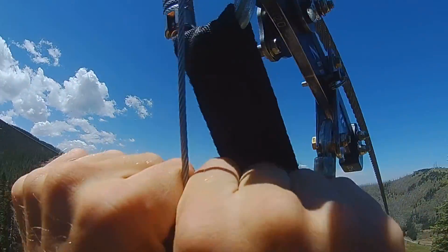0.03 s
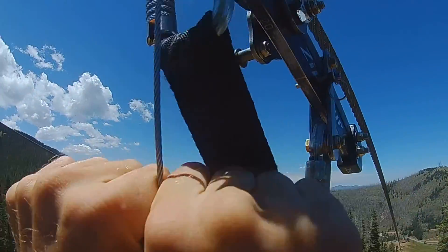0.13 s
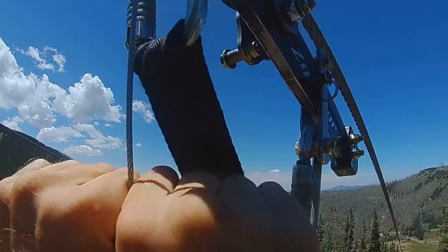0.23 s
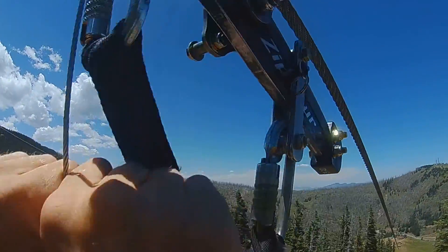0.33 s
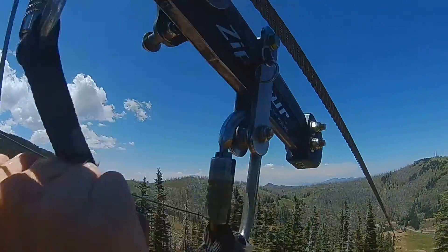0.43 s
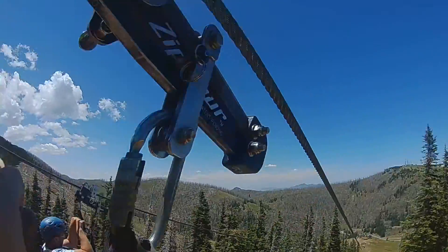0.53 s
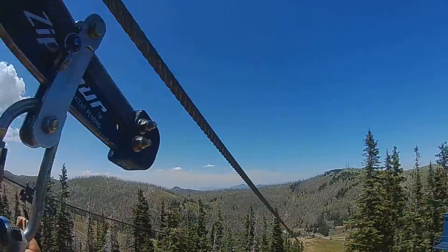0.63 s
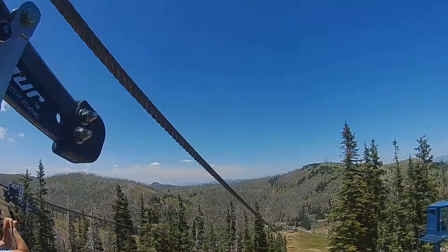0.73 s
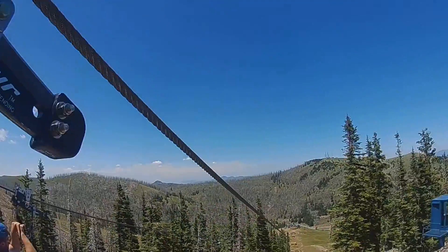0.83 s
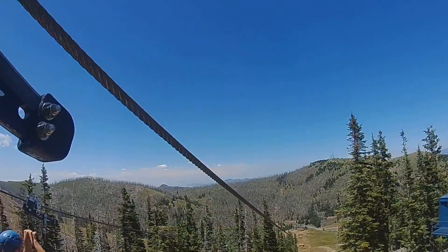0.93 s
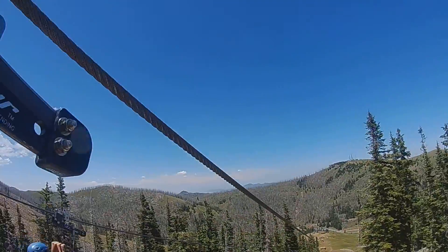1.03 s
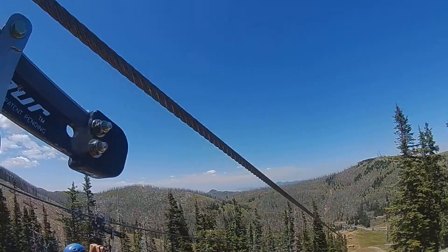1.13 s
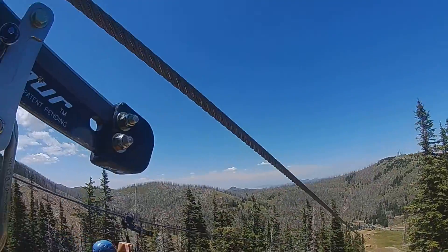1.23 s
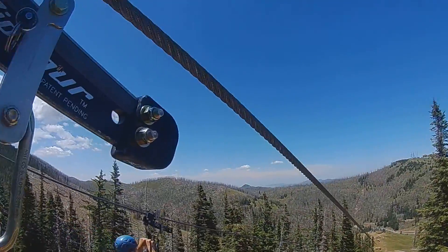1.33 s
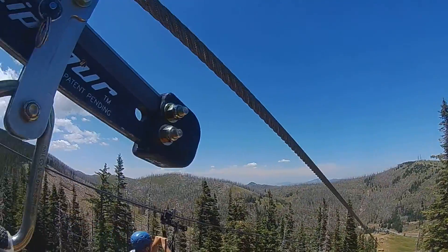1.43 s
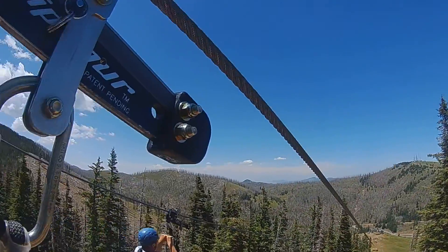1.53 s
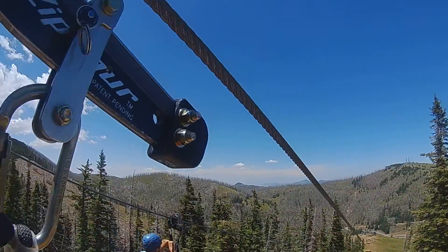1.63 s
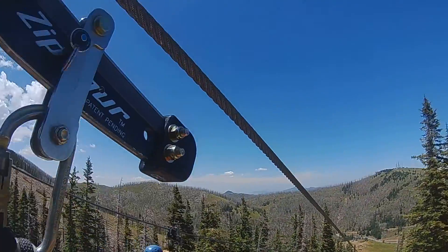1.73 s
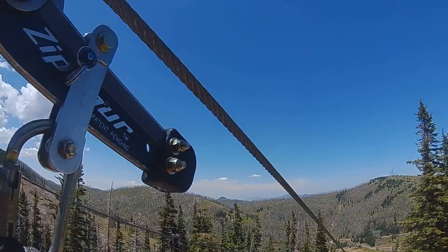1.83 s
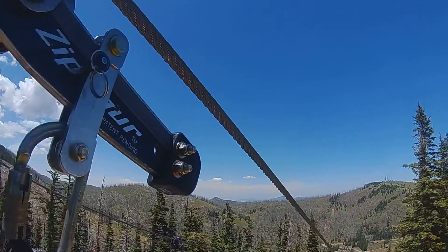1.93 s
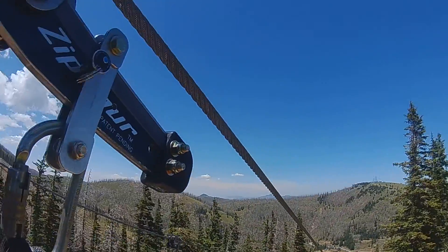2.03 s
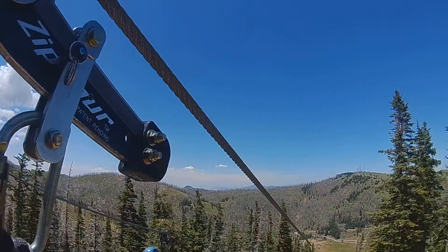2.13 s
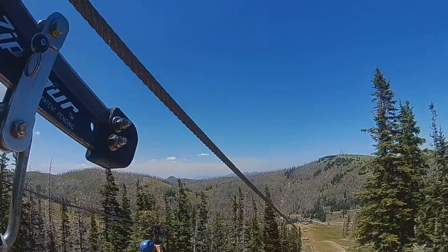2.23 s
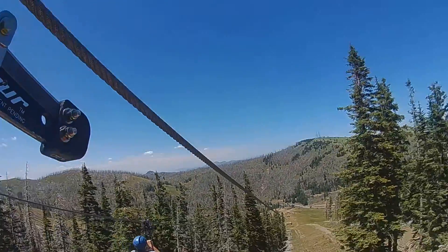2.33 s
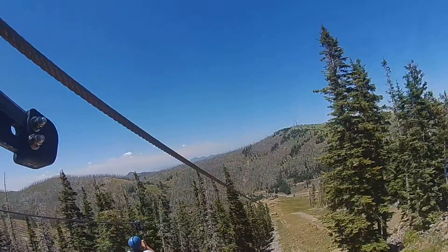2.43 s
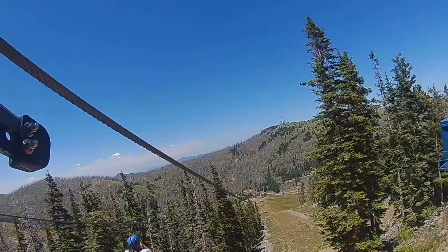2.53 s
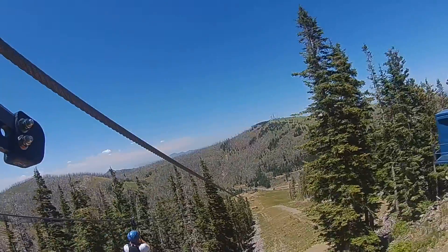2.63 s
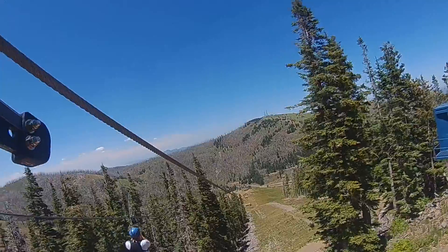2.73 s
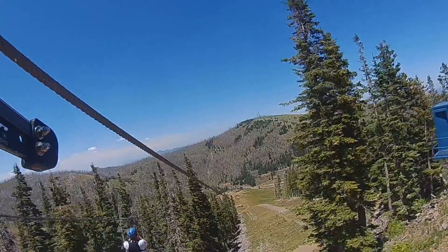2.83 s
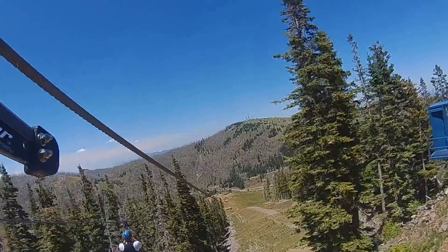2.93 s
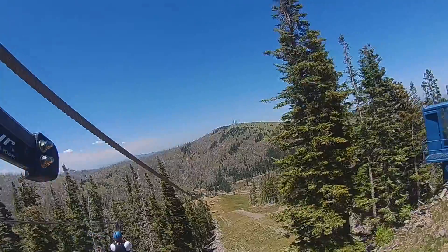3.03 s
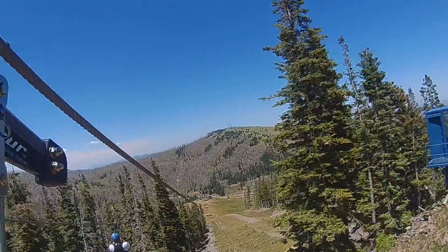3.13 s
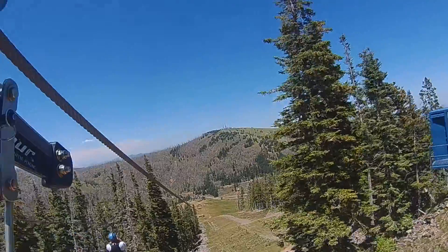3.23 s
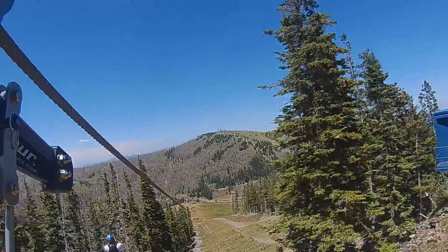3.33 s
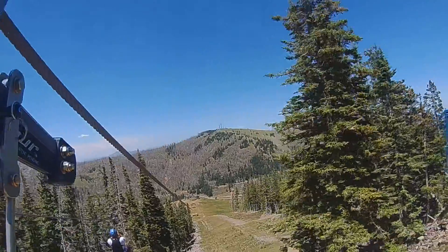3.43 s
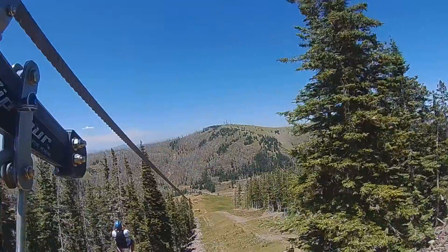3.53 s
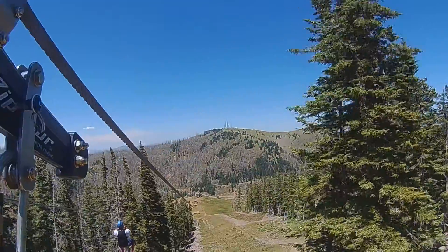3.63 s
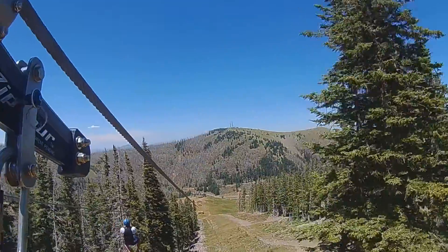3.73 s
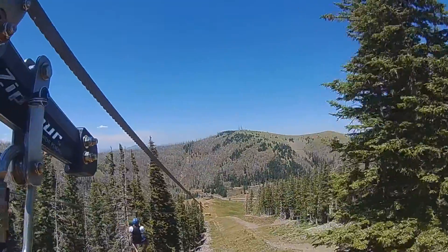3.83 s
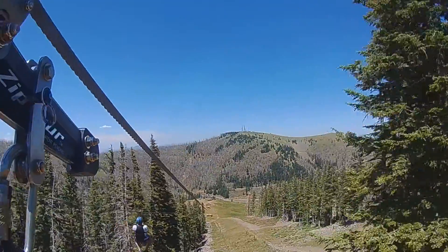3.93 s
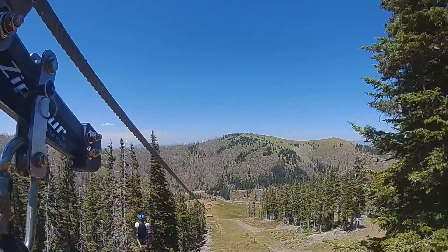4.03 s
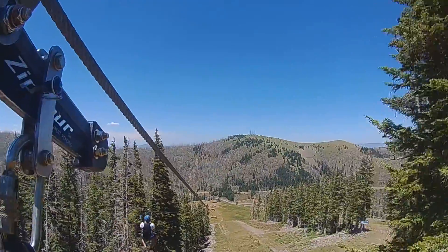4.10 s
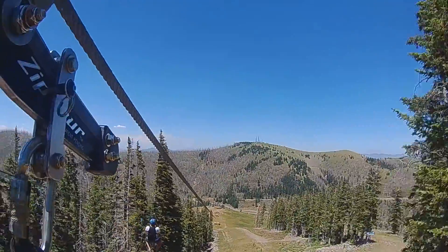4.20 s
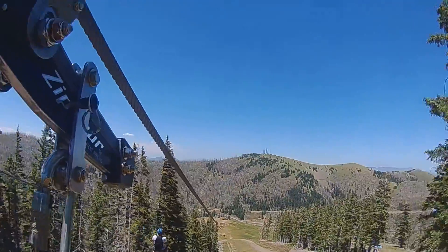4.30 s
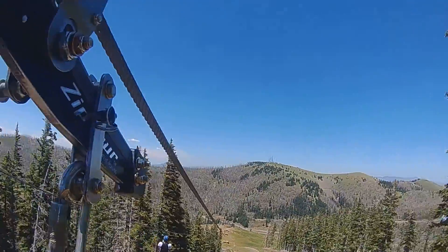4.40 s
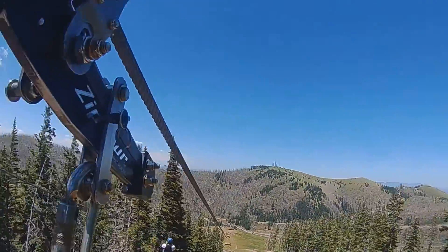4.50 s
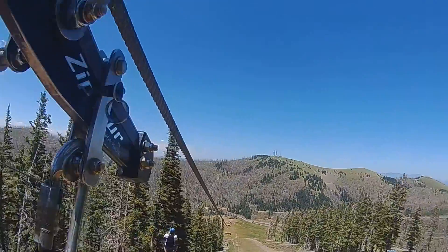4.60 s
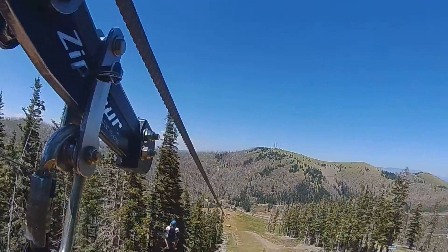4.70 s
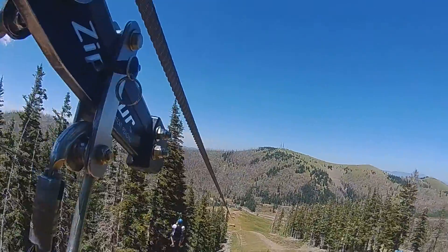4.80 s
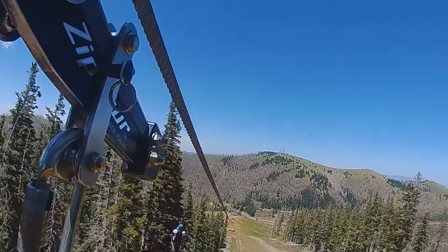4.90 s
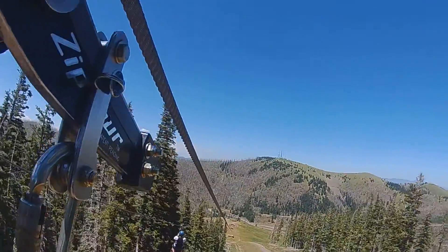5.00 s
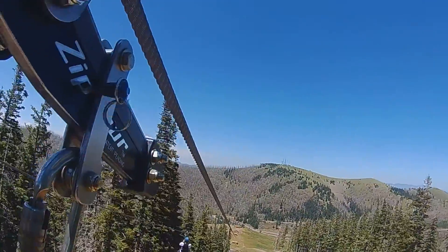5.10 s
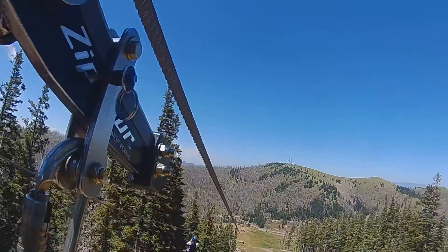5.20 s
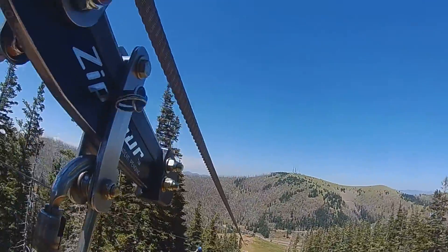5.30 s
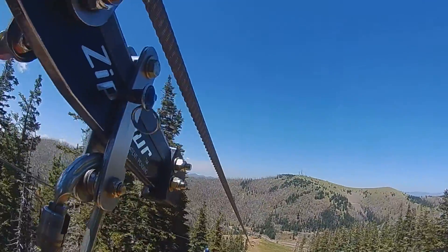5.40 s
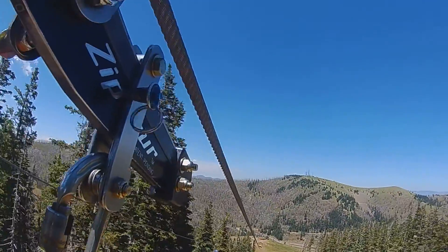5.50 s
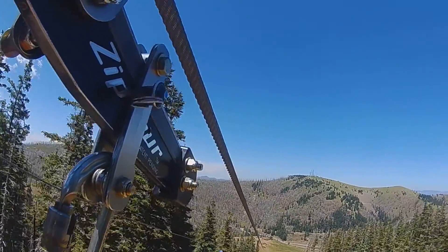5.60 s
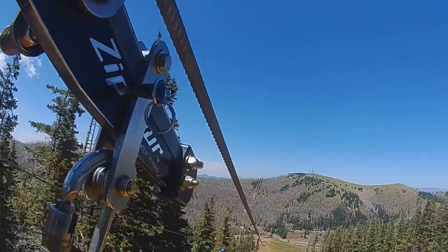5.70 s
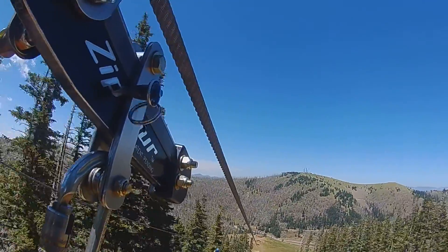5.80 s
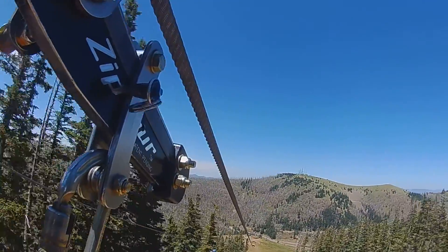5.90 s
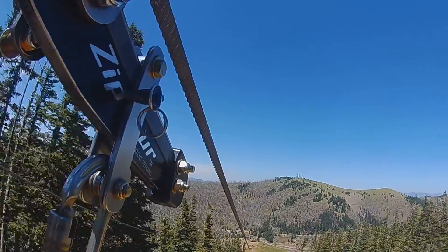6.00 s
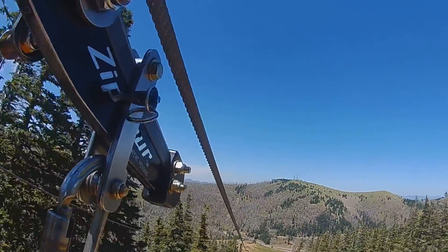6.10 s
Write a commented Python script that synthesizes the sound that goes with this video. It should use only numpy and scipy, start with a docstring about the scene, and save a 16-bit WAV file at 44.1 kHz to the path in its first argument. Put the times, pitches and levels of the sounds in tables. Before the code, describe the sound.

Close, uneven metallic knocks and clatter come from trolley wheels setting off down a zip line, with a few small pings and a brief harsher scrape. The knocks thin out and the rolling smooths into a continuous metallic rush, growing louder as the cable's whine rises in pitch. The rigging hums low underneath, and open air rushes over the microphone riding just under the cable.

```python
"""Just below a zip line, as a trolley gathers speed on the twisted steel cable.
The wheels rattle and knock over the wires and ring the metal of the trolley; the strands passing under
them sing a rising whine. A loose fitting pings, and there is one dull bump. With speed the rattle fuses
into a steady rush, the rigging hums, wind builds at the microphone and a thin hiss creeps in on top."""
import sys
import numpy as np
from scipy import signal
from scipy.fft import rfft, irfft
from scipy.io import wavfile
from scipy.ndimage import uniform_filter1d, minimum_filter1d

SR = 44100
rng = np.random.default_rng(int(sys.argv[2]) if len(sys.argv) > 2 else 0)


def output_pcm(signal):
    """Save a mono or channel-first signal as 16-bit PCM at the path in sys.argv[1].

    Samples are clipped to [-1, 1] before scaling.
    """
    pcm = np.clip(np.atleast_2d(signal).T, -1, 1) * 32767
    wavfile.write(sys.argv[1], SR, np.round(pcm).astype(np.int16))


N = 271215
TIME = np.arange(N) / SR
STRANDS_PER_TWIST = 6


def amp(db):
    """Decibels to gain."""
    return 10 ** (np.asarray(db) / 20)


def unit(x):
    """Scales to rms 1."""
    return x / np.sqrt(np.mean(x ** 2) + 1e-20)


def steady(x):
    """Rides the level to hold the running rms near 1."""
    return x / np.sqrt(uniform_filter1d(x ** 2, size=6000))


def noise(spectrum):
    """Noise of rms 1, coloured by a curve of (Hz, dB) points."""
    hz, db = np.transpose(spectrum)
    gain = amp(np.interp(np.log(np.fft.rfftfreq(N, 1 / SR) + 1), np.log(hz), db))
    return unit(irfft(rfft(rng.standard_normal(N)) * gain, N))


def drift(hz):
    """A smooth random wander of rms 1, rolling off above hz."""
    gain = np.exp(-(np.fft.rfftfreq(N, 1 / SR) / hz) ** 2)
    return unit(irfft(rfft(rng.standard_normal(N)) * gain, N))


def ring(force, modes, damping_hz=7600):
    """Rings steel with a force: steep-sided resonances in a causal filter of unit energy."""
    bins = np.fft.rfftfreq(4096, 1 / SR)
    power = sum(amp(db) ** 2 / (1 + (2 * (bins - hz) / width) ** 2) ** 2 for hz, width, db in modes)
    power = power / (1 + (bins / damping_hz) ** 6)
    cepstrum = irfft(np.log(power + 1e-12) / 2)
    cepstrum[1:len(bins) - 1] *= 2  # minimum phase, so the ring follows the hit
    cepstrum[len(bins):] = 0
    response = irfft(np.exp(rfft(cepstrum)))
    return signal.oaconvolve(force, response / np.linalg.norm(response))[:len(force)]


def grown(speed, rest_db, full_db, power):
    """A fader in dB that follows the speed, from rest (0) to full speed (1)."""
    return rest_db + (full_db - rest_db) * speed ** power


def stretch(start, end, edge_s):
    """Fades up to 1 around start, holds, and fades out around end."""
    return np.clip(np.minimum(TIME - start, end - TIME) / edge_s + .5, 0, 1)


def lifts(rows, edge_s):
    """Summed lift in dB from rows of (start, end, dB)."""
    return sum(db * stretch(start, end, edge_s) for start, end, db, *_ in rows)


def add(mix, start_s, sound):
    """Drops a sound into the mix."""
    part = mix[round(start_s * SR):][:len(sound)]
    part += sound[:len(part)]


def wheel_pressure(strands, speed, jolt_s=.006):
    """The wheel bears on the cable with random jolts and a beat for each twist."""
    slowness = np.clip(1.12 - 1.02 * speed, 0, 2)  # separate rattles fuse as the speed grows
    kicks = (rng.random(N) < (110 + 160 * speed) / SR) * rng.uniform(0.2, 1.5, N)
    jolts = signal.lfilter([1], [1, -np.exp(-1 / (jolt_s * SR))], kicks)  # sudden rise, slower fall
    twist_beat = np.cos(2 * np.pi * strands / STRANDS_PER_TWIST)
    return amp(slowness * (3.0 * np.minimum(jolts, 2.5) + 1.36 * twist_beat))


def rolling(speed, spread_db=3.5, scrape=0.59):
    """Single wires tick under the wheel, denser with speed, over a bed of fine scraping."""
    struck = rng.random(N) < (900 + 5500 * speed ** 2) / SR
    ticks = struck * rng.choice([-1, 1], N) * amp(spread_db * np.minimum(rng.exponential(1, N), 3.2))
    return unit(ticks) + scrape * rng.standard_normal(N)


def contact_forces(strands, speed, buzz=0.037, hardness=0.57):
    """Wheel on cable: a force with a ridge buzz for the body, and a spikier one for the bright modes."""
    pressure = wheel_pressure(strands, speed)
    contact = pressure * rolling(speed)
    phase = 2 * np.pi * (strands + 0.025 * drift(22))
    ridges = buzz * sum(np.sin(k * phase) * (1 + .5 * drift(11)) for k in range(3, 10))
    force = steady(contact) * amp(-0.5 * (2 - speed))  # the rider's weight keeps the mean force even
    return force + ridges, steady(contact * pressure ** hardness)


# The voices of the steel: hanger, side plates, wheels, wires, the clang when knocked, the thin scrape.
# Each row: pitch in Hz, width in Hz, relative level in dB.
HANGER_MODES = [(603.4, 67, -19.5), (814, 390, -25), (915, 230, -21), (1229.7, 125, 1), (1309, 276, -10.5)]
PLATE_MODES = [(1837, 238, -2.5), (1952, 220, 3), (2826, 320, -13), (3220, 800, -11.5), (3370, 283, -10.5),
               (3592, 280, -7.5), (4250, 300, -21), (4760, 380, -23)]
WHEEL_MODES = [(2262, 306, -9.5)]
WIRE_MODES = [(4876, 150, 1.5), (5290, 650, 0.5), (5806, 530, -0.5), (6360, 250, -7), (7000, 500, -25.5),
              (9300, 2900, -46.5)]
CLANG_MODES = [(1212.6, 80, -13.5), (1985, 127, 1), (2160, 110, -5.5), (2285, 450, -14.5), (2740, 110, -17),
               (3060, 230, -15.5), (3644, 140, -8.5), (4260, 220, -25), (4700, 180, -27),
               (6360, 160, -32.5), (2830, 540, -32.5)]
THIN_SCRAPE_MODES = [(7650, 1100, -1), (8900, 420, 9.5), (9700, 800, 0.5), (11600, 1000, -11)]
# Harsher scraping. Each row: start and end in seconds, rattle lift in dB, thin scrape level in dB.
HARSH_SCRAPES = [(1.367, 2.21, 3, -70.5)]
# The wheels ring out. Each row: start and end in seconds, lift in dB.
WHEEL_RING_OUTS = [(0.643, 1.25, 6.5), (2.212, 2.68, 14.5), (2.78, 3.45, 9)]


def trolley_rattle(strands, speed, scrape_db, ring_out_db):
    """Rolling contact rings the hanger, the side plates, the wheels and the wires."""
    force, hard_force = contact_forces(strands, speed)
    starting = np.clip(1 - (TIME - 0.35) / 0.27, 0, 1)
    loose = np.clip(0.42 * (1 - speed), 0, 1)  # at low speed the steel rings out between rattles
    hanger = amp(grown(speed, -39.5, -17, power=1.054)) * ring(force, HANGER_MODES)
    plate_ring = (1 - loose) * ring(force, PLATE_MODES) + loose * ring(force, CLANG_MODES)
    plates = amp(grown(speed, -29.5, -10, power=1.62)) * plate_ring
    plates += amp(-36) * starting * ring(force, [(2020, 110, 0.0086)])  # one plate rings narrowly
    wheels = amp(grown(speed, -44, -29, power=1.41) + ring_out_db) * ring(force, WHEEL_MODES)
    wires_db = grown(speed, -47.5, -34, power=2.63) + 0.22 * ring_out_db
    wires_db -= 9 * starting  # the wires open up once the trolley is under way
    wires = amp(wires_db) * ring(hard_force, WIRE_MODES, damping_hz=10900)
    body = amp(scrape_db - 0.04 * ring_out_db) * (hanger + plates + wires)  # ducks as the wheels ring
    scrape_gain = sum(amp(db) * stretch(start, end, edge_s=.3) for start, end, _, db in HARSH_SCRAPES)
    return body + wheels + scrape_gain * ring(hard_force, THIN_SCRAPE_MODES, damping_hz=14000)


# The whine's tone and octave. Each row: multiple of the strand rate, base level at full speed in dB,
# rise in dB per doubling of the speed.
WHINE_PARTIALS = [(1, -42, 17), (2, -35.5, 17.5)]
# Hanger resonances that swell a tone gliding through. Each row: centre in Hz, width in Hz, lift in dB.
HANGER_SWELLS = [(570, 80, 7.5), (880, 88, 3), (1130, 200, 6.5)]


def cable_whine(strands, strand_hz, speed, scrape_db, ring_out_db, flutter_db=2.5, wander_db=1.1):
    """The cable's ridges shake the wheels into a whine, up in a scrape, down as the wheels ring out."""
    phase = 2 * np.pi * (strands + 0.046 * drift(30))
    tones = 0
    for multiple, full_db, rise_db in WHINE_PARTIALS:
        k = round(multiple)
        swell_db = sum(db / (1 + (2 * (k * strand_hz - hz) / width) ** 2)
                       for hz, width, db in HANGER_SWELLS)
        waver_db = flutter_db * drift(24) + wander_db * drift(1.6)
        tones += amp(full_db + rise_db * np.log2(speed) + swell_db + waver_db) * np.sin(k * phase)
    return np.sqrt(2) * amp(0.89 * scrape_db - 0.4 * ring_out_db) * tones


# The colour of the low buffeting and of the airy rush. Each row: frequency in Hz, relative level in dB.
BUFFET_SPECTRUM = [(15, -31.5), (30, -29), (45, -9), (62, 5.5), (80, -2.5), (110, -11.5), (200, -30.5),
                   (600, -72)]
RUSH_SPECTRUM = [(15, -19), (40, -11), (100, -6), (250, -1), (500, 1.5), (1000, -7), (4000, -36.5),
                 (16000, -69.5)]
# Gusts. Each row: start and end in seconds, lift of the buffeting in dB.
WIND_GUSTS = [(0, .25, 6.5), (.78, 1.25, 8), (2.25, 2.75, 7.5), (2.8, 3.65, 9)]


def wind(speed):
    """Air buffets the microphone under a wider rush; gusts lift both, the rush more gently."""
    gust_db = lifts(WIND_GUSTS, edge_s=.12)
    buffet = amp(grown(speed, -64, -56, power=0.89) + gust_db) * noise(BUFFET_SPECTRUM)
    rush = amp(grown(speed, -89, -34.5, power=0.85) + 0.44 * gust_db) * noise(RUSH_SPECTRUM)
    return buffet + rush


# Hard knocks of a wheel on the cable. Each row: start in seconds, relative strength in dB,
# brightness in dB (-16 is neutral), chatter decay in seconds.
WHEEL_KNOCKS = [(0.1456, -11.5, -23, 0.007), (0.1664, -10, -26, 0.008), (0.2074, -9, -23, 0.01),
                (0.2354, -6.5, -38, 0.007), (0.2592, -14, -21, 0.007), (0.2862, -14.5, -18.5, 0.0063),
                (0.3396, -5, -24, 0.007), (0.347, -14, -27, 0.007), (0.366, -13, -15, 0.0062),
                (0.4194, -14, -11.5, 0.0058), (0.4384, -17, -7.5, 0.0061), (0.489, -15.5, -9.5, 0.007),
                (0.619, -15.5, -6, 0.015), (0.6418, -17, -17, 0.007), (0.6883, -16.5, -4, 0.0056),
                (0.7716, -18, -9, 0.0057), (0.7951, -14, -21, 0.0063), (0.9248, -14, -10, 0.0039),
                (0.9522, -18, -7, 0.0053), (1.0224, -7.5, -26, 0.007), (1.1508, -26, -3, 0.007),
                (1.2476, -18.5, -7, 0.007), (1.2919, -12, -15, 0.007), (1.4002, -13, -24, 0.0082),
                (1.6034, -14.5, -10, 0.0059), (1.6871, -15, -20, 0.0063), (1.7894, -14, -20, 0.0078),
                (1.8751, -8, -15.5, 0.007), (1.948, -13, -9, 0.0077), (2.055, -4, -17, 0.0082),
                (2.2596, -7.5, -15.5, 0.007), (2.2862, -9, -16.5, 0.009), (2.4038, -6.5, -26, 0.007),
                (2.6504, -2, -35, 0.0042), (3.248, -23, -19, 0.007), (3.8796, -3, -25, 0.007)]


def knocks(chatter_share=1.12, boost_db=9.0, neutral_db=-16, crossover_hz=2550):
    """A tap and a little chatter set the steel clanging; sharper knocks reach the high modes."""
    t, dull, sharp = TIME[:2000], np.zeros(N), np.zeros(N)
    for start_s, db, brightness_db, chatter_s in WHEEL_KNOCKS:
        chatter = rng.standard_normal(len(t)) * np.exp(-t / chatter_s)
        force = amp(db + boost_db) * ((t == 0) + chatter_share * chatter / np.linalg.norm(chatter))
        add(dull, start_s, force)
        add(sharp, start_s, force * amp(0.96 * (brightness_db - neutral_db)))
    lows = signal.lfilter(*signal.butter(4, crossover_hz, "low", fs=SR), dull)
    highs = signal.lfilter(*signal.butter(4, crossover_hz, "high", fs=SR), sharp)
    return ring(lows + highs, CLANG_MODES, damping_hz=6040)


# Pings of loose hardware on the trolley. Each row: start in seconds, peak level in dB.
HARDWARE_PINGS = [(.697, -25), (.915, -31), (1.249, -28)]


def pings(hz=3630, attack_s=0.0031, decay_s=0.0081):
    """One high mode of a loose metal part builds for a moment and rings away."""
    t, out = TIME[:5000], np.zeros(N)
    envelope = (1 - np.exp(-t / attack_s)) * np.exp(-t / decay_s)
    ping = envelope / envelope.max() * np.sin(2 * np.pi * hz * t)
    for start_s, db in HARDWARE_PINGS:
        add(out, start_s, amp(db) * ping)
    return out


# Overtones of the hum. Each row: multiple of the twist rate, level in dB against the fundamental.
RIGGING_OVERTONES = [(2, -18), (3, -11)]


def rigging_hum(strands, strand_hz, resonance_hz=64, width_hz=23, level_db=-45.5, skirt=.12):
    """Each twist of the cable pushes the rigging, which hums most when they pass at its own pitch."""
    twist_hz = strand_hz / STRANDS_PER_TWIST
    phase = 2 * np.pi * strands / STRANDS_PER_TWIST
    response = skirt + (1 - skirt) / np.sqrt(1 + abs(2 * (twist_hz - resonance_hz) / width_hz) ** 3)
    push = np.minimum(twist_hz / resonance_hz, 1) ** 2.3  # slow twists push gently
    overtones = sum(amp(db) * (1 + .5 * drift(7.6)) * np.sin(round(k) * phase)
                    for k, db in RIGGING_OVERTONES)
    return np.sqrt(2) * amp(level_db + 2.5 * drift(6.5)) * response * push * (np.sin(phase) + overtones)


def bump(start_s=2.70, hz=210, gain_db=-44, swell_s=0.011):
    """One soft, dull bump: a low tone that swells and dies."""
    age = np.maximum(TIME - start_s, 0) / swell_s
    return amp(gain_db) * age ** 2 * np.exp(-age) * np.sin(2 * np.pi * hz * TIME)


# The colour of the thin hiss. Each row: frequency in Hz, relative level in dB.
SIZZLE_SPECTRUM = [(3000, -31), (6500, 3), (8000, 1), (11000, -14), (13500, -15), (15000, -11)]


def sizzle(speed, rattle):
    """A thin hiss near full speed that flares with the loudest moments of the rattle."""
    flare = steady(uniform_filter1d(rattle ** 2, size=150))
    return amp(grown(speed, -98.5, -48.5, power=1.4)) * flare * noise(SIZZLE_SPECTRUM)


# The ride down the cable. Each row: time in seconds, strands passing per second.
STRAND_RATE = [(0, 92), (1.42, 174), (2.05, 204), (2.4, 235), (3.3, 313), (3.85, 374), (4.36, 427),
               (4.5, 437), (4.68, 458), (5.18, 501), (5.8, 539), (6.15, 565)]


def scene():
    """The speed along the cable drives the rattle, the whine, the hum, the hiss and the wind, in mono."""
    strand_hz = np.interp(TIME, *np.transpose(STRAND_RATE))
    strands = np.cumsum(strand_hz) / SR  # strands passed so far
    speed = strand_hz / strand_hz.max()
    scrape_db = lifts(HARSH_SCRAPES, edge_s=0.088)
    ring_out_db = lifts(WHEEL_RING_OUTS, edge_s=0.23)
    rattle = trolley_rattle(strands, speed, scrape_db, ring_out_db) + knocks() + pings()
    whine = cable_whine(strands, strand_hz, speed, scrape_db, ring_out_db)
    hum = rigging_hum(strands, strand_hz)
    return (rattle + whine + hum + sizzle(speed, rattle) + bump() + wind(speed))[None]


def record(dry, ceiling=0.56, hiss_db=-83, cutoff_hz=15750):
    """A fast limiter holds the peaks, faint hiss sits underneath, and a steep low-pass trims the top."""
    allowed_gain = np.minimum(1, ceiling / (abs(dry) + 1e-9))
    limited = dry * uniform_filter1d(minimum_filter1d(allowed_gain, size=41), size=61)
    out = limited + amp(hiss_db) * rng.standard_normal(dry.shape)
    low_pass = signal.firwin(511, cutoff_hz, window=("kaiser", 9), fs=SR)
    return signal.oaconvolve(out, low_pass[None], "same")


dry = scene()
out = record(dry)
output_pcm(out)
```